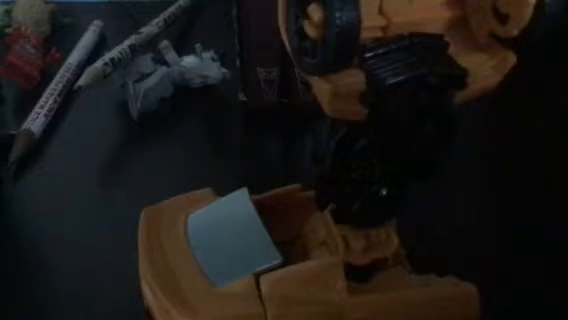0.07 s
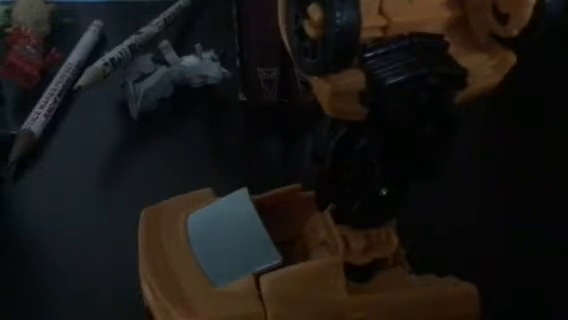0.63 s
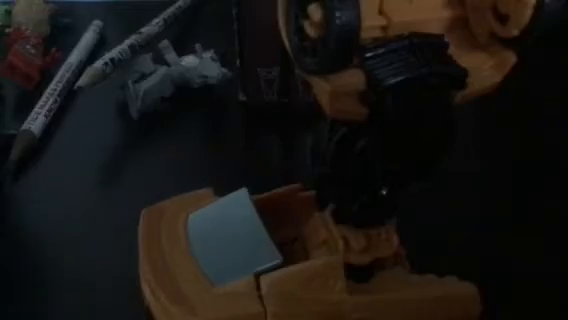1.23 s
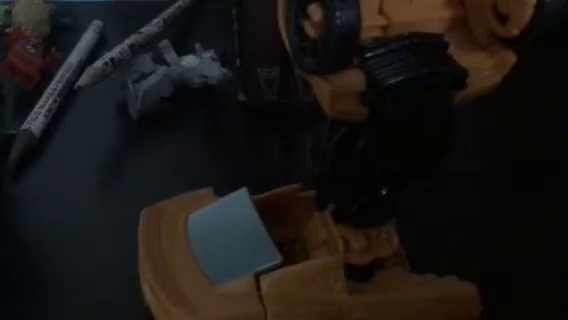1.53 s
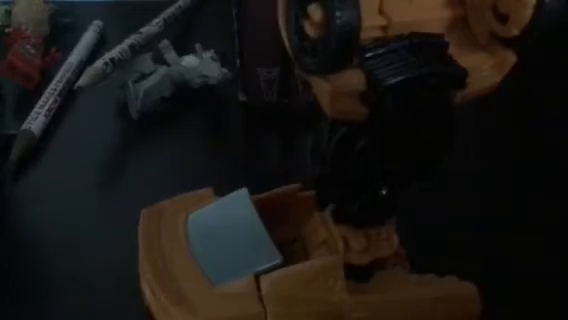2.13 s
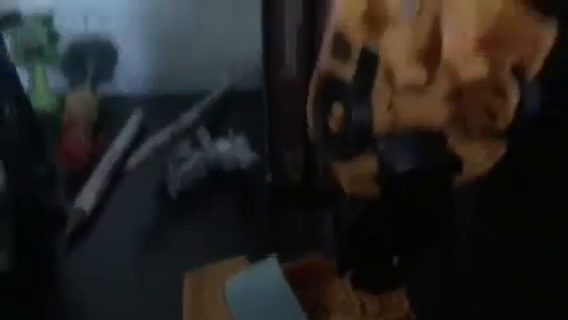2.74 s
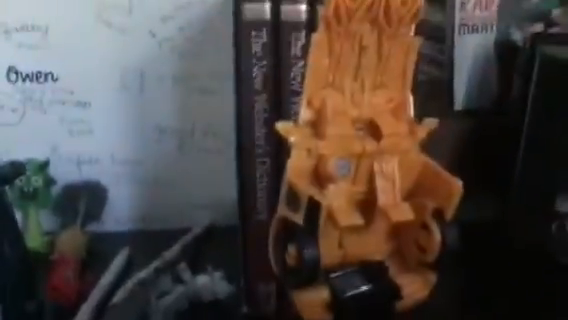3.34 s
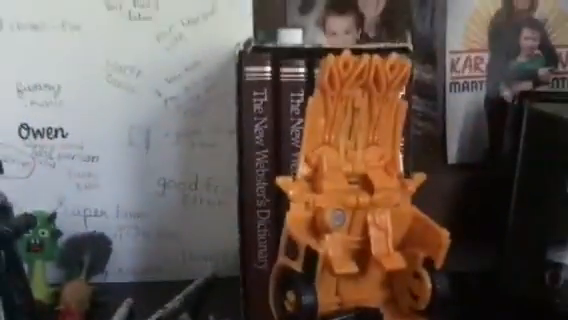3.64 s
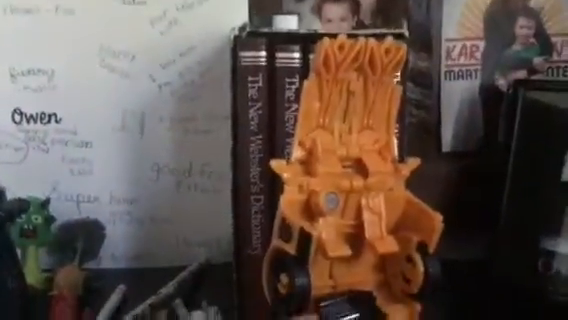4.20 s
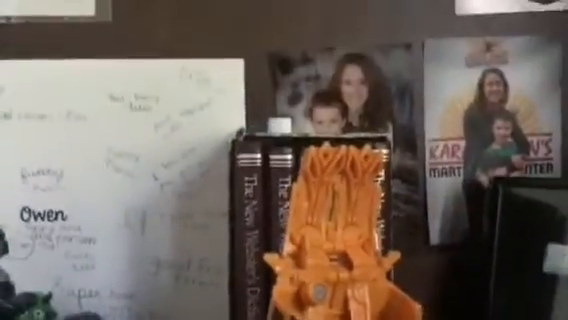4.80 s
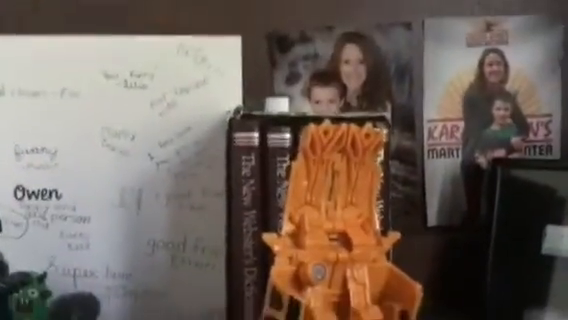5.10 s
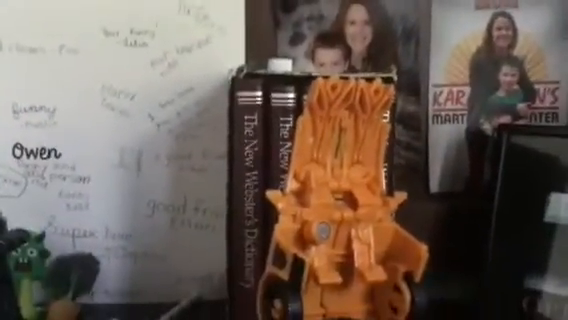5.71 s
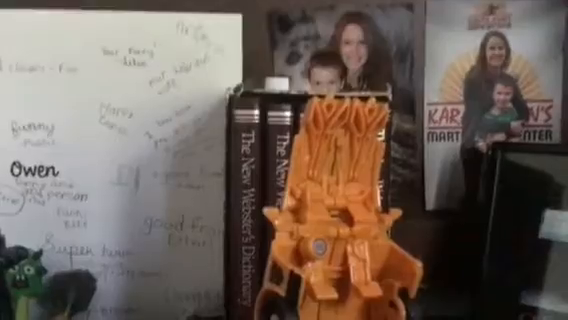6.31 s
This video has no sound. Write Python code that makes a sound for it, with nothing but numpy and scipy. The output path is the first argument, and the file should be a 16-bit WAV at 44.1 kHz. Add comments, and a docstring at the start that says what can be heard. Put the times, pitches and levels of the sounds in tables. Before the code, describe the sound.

In a small, quiet room, a fan hums faintly while plastic is handled right by the microphone. First comes a hard knock on a desk and a short slide. Uneven clicks, snaps and brief scrapes follow as fingers move over a hollow toy and its joint gives. Toward the end a second low hum swells softly, and the handling fades to light rubbing and dull bumps.

```python
"""A hollow plastic case, handled at a desk in a small, quiet room, very near the microphone.
First one plastic piece knocks on the desk and slides. Then the case is gripped and tilted:
fingers stick and slip over it, its joint scrapes and snaps, and each contact rings the shell.
A fan hums low underneath, and a second low hum swells towards the end."""
import sys
import numpy as np
from scipy import signal
from scipy.fft import rfft, irfft
from scipy.io import wavfile
from scipy.ndimage import uniform_filter1d

SR = 44100
rng = np.random.default_rng(int(sys.argv[2]) if len(sys.argv) > 2 else 0)


def pcm_store(signal):
    """Save signal as 16-bit PCM."""
    levels = np.round(np.clip(np.atleast_2d(signal), -1, 1) * 32767)
    wavfile.write(sys.argv[1], SR, levels.astype(np.int16).T)


N = 280035
T = np.arange(N) / SR
BODY_HZ, CRACK_HZ, CRACK_TOP_HZ, TOP_HZ = 268, 1198, 6900, 16100  # band edges


def undb(db):
    """Decibels to gain."""
    return 10 ** (np.asarray(db) / 20)


def unit(x):
    """Scale to rms 1."""
    return x / np.sqrt(np.mean(x ** 2))


def steady(x, span_s=0.037):
    """Keep the grain, but even out the slow level to rms 1."""
    return x / np.sqrt(uniform_filter1d(x ** 2, int(span_s * SR)) + 1e-6 * np.mean(x ** 2))


def band(x, lo_hz, hi_hz, order=3):
    """Causal band-pass."""
    return signal.sosfilt(signal.butter(order, [lo_hz, hi_hz], "band", fs=SR, output="sos"), x)


def resonate(x, hz, width_hz):
    """One resonance, gain 1 at its centre."""
    return signal.lfilter(*signal.iirpeak(hz, hz / width_hz, fs=SR), x)


def walk(per_s):
    """Smooth random wander, rms 1."""
    k = int(SR / per_s)
    steps = np.repeat(rng.standard_normal(N // k + 1), k)
    return unit(uniform_filter1d(uniform_filter1d(steps, k), k)[:N])


def fan_and_room_tone(waver_hz=1.1, flutter_db=1, air_db=-65.5):
    """A wavering fan hum over low room noise and microphone hiss."""
    # fan, mains and two faint whines: (frequency [Hz], level [dB])
    hum_lines = [(70, -64), (116, -68), (167, -81.5), (210, -73.5), (690, -89.5), (3155, -101)]
    # room noise and hiss: (frequency [Hz], relative density [dB])
    air_spectrum = [(25, -18.5), (45, -6), (70, -3.5), (100, -9), (210, -15), (290, -21.5), (450, -28.5),
                    (680, -31), (900, -37.5), (1800, -42), (5000, -44), (8000, -48), (16000, -56)]
    air_hz, density_db = np.transpose(air_spectrum)
    bins_hz = np.fft.rfftfreq(N, 1 / SR) + 1
    colour = undb(np.interp(np.log(bins_hz), np.log(air_hz), density_db))
    air = irfft(rfft(rng.standard_normal(N)) * colour, N)
    hum = np.zeros(N)
    for hz, db in hum_lines:
        peak = np.sqrt(2) * undb(db + flutter_db * walk(9.4))
        hum += peak * np.sin(2 * np.pi * np.cumsum(hz + waver_hz * walk(7.8)) / SR)
    return undb(air_db) * unit(air) + hum


def slips(per_s, spread_db):
    """Stick-slip: tiny releases at random moments, a few much larger than the rest."""
    size = undb(spread_db * np.minimum(rng.exponential(size=N), 4))
    return (rng.random(N) < per_s / SR) * size * rng.choice([-1, 1], N)


def hollow_case(force, grip_db, tuning=0.98, direct_db=-19, reflection_s=0.0017, reflection=0.12):
    """A force rings the case; the grip changes the level of each resonance by its own amount."""
    # resonances of the shell: (frequency before tuning [Hz], width [Hz], gain [dB])
    case_modes = [(200, 120, 2), (320, 192, 4.5), (508, 177, 3), (602, 102, 2), (787, 140, -2.5),
                  (1100, 340, -6.5), (1400, 110, -9.5), (1517, 110, -6.5), (1975, 360, -10.5),
                  (2164, 160, -5.5), (2387, 150, -12), (2970, 350, -9), (2980, 140, -9.5),
                  (3400, 260, -23.5), (3680, 250, -40.5), (4700, 430, -29), (5000, 300, -15),
                  (5720, 500, -31.5), (8800, 310, -20), (12400, 560, -34.5), (15000, 1800, -33)]
    out = undb(direct_db) * band(force, 330, 4900, order=4)
    for k, (hz, width, db) in enumerate(case_modes):
        grip = walk(9) if len(force) == N else rng.standard_normal()  # constant through a short snap
        out += (-1) ** k * undb(db + grip_db * grip) * resonate(force, hz * tuning, width)
    # a reflection from a surface close by hollows the tone
    delayed = np.pad(out, (int(reflection_s * SR), 0))[:len(out)]
    return out + reflection * delayed


def stroke_pressure(t, length, swell_db, arch_db=4, attack_s=0.02, release_s=0.01):
    """A stroke takes hold, swells or eases along an arch, and lets go."""
    from_middle = np.clip(t / length, 0, 1) - .5
    hold = undb(swell_db * from_middle + arch_db * (np.cos(np.pi * from_middle) - .5))
    return np.minimum(t / attack_s, 1) * hold * np.exp(-np.maximum(t - length, 0) / release_s)


def sliding(jerk_db=1.5, rasp_share=0.49, sheen_db=-35.5, sheen_slope=0.75):
    """Skin drags dully over the case; harder contact adds grit; the hand's weight rumbles."""
    # strokes of a finger or a sliding piece, levels before the trims: (start [s], length [s], drag [dB],
    # swell [dB], grit over drag [dB], hand weight over drag [dB], rasp pitch [Hz], rasp gain [dB])
    strokes = [ (0.611, 0.087, -68, -16, -11, 16, 134, 21), (0.812, 0.14, -81, 1, 2, 14.5, 5500, 7),
               (0.948, 0.072, -60.5, 7.5, -7.5, 10.5, 1980, -3), (1.043, 0.08, -37.5, 3, -21, -3, 343, 6),
               (1.136, 0.18, -63.5, -11, -11, 5, 570, 4), (1.32, 0.065, -67, -0.5, -10.5, 8, 408, -3),
               (1.38, 0.33, -73.5, 2, -9, 6, 4500, -8), (1.969, 0.073, -77, -2.5, 3.5, 10, 5500, 8.5),
               (2.049, 0.053, -55.5, -7.5, -7.5, 7, 296, -3), (2.172, 0.053, -60, -12, 0, -7, 5000, -2),
               (2.227, 0.13, -42, 12, -20.5, -24, 610, 8), (2.363, .12, -45.5, -6.5, -14, -12.5, 750, -8),
               (2.436, 0.1, -48.5, 19.5, 1.5, -21, 1620, -5), (2.658, 0.063, -50, 13, -2.5, -9, 2150, -1),
               (2.772, 0.055, -53.5, 13, -9, -9, 2150, 2), (2.831, 0.13, -50.5, 14, -10, -8.5, 970, -15),
               (3.037, 0.042, -50.5, 6.5, -10, -22, 594, -18), (3.102, 0.08, -62, -16, -13.5, -1, 580, -6),
               (3.18, 0.096, -60, -10.5, -7.5, 3, 2000, -17), (3.275, 0.05, -52, 7.5, -1, 7, 2020, -3),
               (3.589, 0.13, -63, 0, -9.5, 4, 4600, -4), (3.702, .12, -58.5, 2, -9.5, 9.5, 252, 7.5),
               (3.888, 0.12, -51, 5.5, -16.5, -16.5, 4700, -1),
               (3.986, 0.16, -57, 7.5, -16.5, -7, 780, -40), (4.16, 0.079, -54.5, 4.5, -16, -15, 442, 0),
               (4.375, 0.069, -49.5, 17, -28, -8, 357, 11), (4.411, 0.072, -54.5, 32, 4, -17, 4570, -16),
               (4.497, 0.1, -43, -4, -3.5, -30, 4660, -21), (4.899, 0.1, -58, 9, -3.5, 6, 3400, -1),
               (4.992, 0.083, -51, 0, -15.5, -1, 380, 10.5),
               (5.071, 0.089, -48, 13.5, -8.5, -3.5, 1095, -2), (5.31, 0.059, -74, -12, -2.5, 5, 4360, -5),
               (5.443, .033, -58.5, -3, -7.5, 5, 512, 12), (5.571, 0.18, -70, -1.5, -8.5, 11, 301, 1.5),
               (5.735, 0.073, -62.5, -6, -9, 9, 298, -1.5), (5.855, 0.15, -64, -6.5, -10, 7, 305, 0.5),
               (6.113, 0.13, -70.5, 10, -11, 11, 232, -3.5), (6.233, 0.055, -52, -18, -26.5, 9, 380, 9.5),
               (6.328, .03, -57.5, 7, -4, 10, 5000, 7)]
    drag_trim_db, scrape_trim_db, rumble_trim_db = -1, -1, -2
    force = slips(per_s=3400, spread_db=2.5) * undb(jerk_db * walk(85))  # the contact catches unevenly
    shell = hollow_case(force, grip_db=3)
    hand = slips(per_s=720, spread_db=3.5)
    # soft skin passes little of the highest treble
    sheen = steady(band(band(force, 7200, TOP_HZ), 2600, 10000, order=1))
    out = holding_hand(shell)
    for start, length, db, swell_db, grit_db, weight_db, rasp_hz, rasp_db in strokes:
        span = slice(int(start * SR), int((start + length) * SR) + SR // 8)
        # each stroke catches at one pitch
        width = rasp_share * rasp_hz
        rung, rocked = (x + undb(rasp_db) * resonate(resonate(x, rasp_hz, width), rasp_hz, width)
                        for x in (shell[span], hand[span]))
        press = undb(db) * stroke_pressure(T[:len(rung)], length, swell_db)
        drag = steady(band(rung, BODY_HZ, CRACK_HZ)) * undb(drag_trim_db)
        scrape = steady(band(rung, CRACK_HZ, 6400, order=7)) * undb(grit_db + scrape_trim_db)
        rumble = steady(band(rocked, 68, 235)) * undb(weight_db + rumble_trim_db)
        # a light touch is airier than a firm one
        hiss = undb(sheen_db) * (press * undb(grit_db)) ** sheen_slope * sheen[span]
        out[span] += press * (drag + scrape + rumble) + hiss
    return out


def desk_knocks(crack_db=-9, crack_s=0.012, hard_contact_s=0.0017):
    """A piece lands, bounces and settles; softer contacts ring fewer of the desk's high modes."""
    # blows and soft bumps: (time [s], strength [dB], contact time [s])
    blows = [(0.623, -45, .004), (1.024, -12, .0003), (1.029, -28.5, 0.00042), (1.0385, -36, .0002),
             (1.106, -28, 0.00067), (5.439, -37.5, 0.0017), (6.244, -36, 0.002)]
    # desk top with the piece on it: (frequency [Hz], gain [dB], time to fall 60 dB [s])
    desk_modes = [(136, -27, 0.66), (237.6, -8.5, 0.057), (288, -9.5, 0.18), (395.5, -6, 0.11),
                  (460, -3.5, 0.027), (562.2, -8, 0.095), (679, 3, .05), (858, -1.5, 0.067),
                  (1082, -7.5, 0.081), (1330, -6.5, 0.028), (1560, -13, 0.073), (1825, -10.5, .06),
                  (2078, -13, 0.086), (2266, -11.5, .05), (2795, -10.5, .05), (3746, -24, 0.043),
                  (4900, -45, .05)]
    out = np.zeros(N + SR)
    t = T[:SR // 2]
    ring = sum((-1) ** k * undb(db) * np.sin(2 * np.pi * hz * t) * np.exp(-np.log(1000) * t / t60)
               for k, (hz, db, t60) in enumerate(desk_modes))
    for start, db, contact_s in blows:
        push = np.exp(-t / contact_s)
        crack = unit(band(rng.standard_normal(len(t)), 900, 3700, order=2)) * np.exp(-t / crack_s)
        crack /= 1 + (contact_s / hard_contact_s) ** 2  # only hard contacts crackle
        knock = signal.fftconvolve(ring + undb(crack_db) * crack, push / push.sum())[:len(t)]
        out[int(start * SR):][:len(t)] += undb(db) * knock
    return out[:N]


def joint_snaps(chatter=0.14, tail_db=-23, tail_s=0.0055, bite_db=-7, bite_share=0.081):
    """A joint lets go: a sharp push and a fading chatter ring the case, which rocks in the hand."""
    # snaps and taps: (time [s], body level [dB], hardness as crack over body [dB],
    # thump over body [dB], chatter decay [s], crack pitch [Hz])
    snaps = [(1.171, -59.5, -5, 16, 0.00056, 2550), (2.07, -59, -2.5, -10, 0.015, 6030),
             (2.095, -43.5, -6, 1, 0.0048, 2260), (2.105, -52.5, 1, 6.5, .016, 3460),
             (2.153, -59.5, 3.5, 7.5, 0.0017, 2700), (2.1829, -39, -12, -28, 0.0018, 1870),
             (2.1936, -41, -21, -24, 0.0034, 1670), (2.234, -60, -0.5, -18, 0.0022, 1670),
             (2.316, -56, -1.5, 0, .001, 3400), (2.55, -46.5, -19, 7.5, 0.0042, 1400),
             (2.712, -40, 2.5, -8, .003, 2000), (2.73, -29.5, -1, -8, 0.0035, 1604),
             (2.926, -37.5, -4.5, -7.5, 0.0018, 1345), (3.047, -57.5, -26, -2, 0.00092, 1400),
             (3.297, -49.5, 1.5, -20, 0.002, 4630), (3.316, -41, -4, 8, 0.0014, 2050),
             (3.319, -54, 15, 18, 0.0016, 4850), (3.484, -67.5, -7, 6, 0.0044, 3970),
             (3.895, -52, -14, -2, 0.0018, 1500), (4.213, -54, -13, -14, 0.003, 2230),
             (4.254, -52.5, -32, -11, 0.0064, 1520), (4.306, -54.5, -18.5, -6, .005, 2480),
             (4.356, -59, -11, 6, 0.0036, 3400), (4.4929, -36.5, -12, -17, 0.0025, 1720),
             (4.591, -53, 8, 5.5, 0.0017, 4430), (4.635, -39, -6.5, -9.5, 0.0022, 2790),
             (4.906, -57, -8.5, 5.5, .0023, 2680), (5.294, -55, -6, -7, 0.0049, 4400),
             (5.753, -58, -13, 3.5, 0.0024, 2450)]
    thump_hz, rise_s, decay_s = 135, 0.0038, 0.005
    out = np.zeros(N + SR)
    t = T[:SR // 8]
    thump = np.sin(2 * np.pi * thump_hz * t) * np.exp(-t / decay_s) * (1 - np.exp(-t / rise_s))
    for start, body_db, hard_db, thump_db, chatter_s, crack_hz in snaps:
        fade = np.exp(-t / chatter_s)
        force = chatter * rng.standard_normal(len(t)) * (fade + undb(tail_db) * np.exp(-t / tail_s))
        force[0] += 1  # the sharp push
        tuning = np.clip(1 + 0.082 * rng.standard_normal(), .9, 1.1)
        shell = hollow_case(force, grip_db=1, tuning=tuning)
        body = band(shell, BODY_HZ, CRACK_HZ)
        # the small part that slips adds its own short ring
        bite = undb(bite_db) * resonate(force, crack_hz, bite_share * crack_hz)
        crack = band(shell + bite, CRACK_HZ, CRACK_TOP_HZ)
        # the finest asperities break one after another, so the sizzle grows with hardness and chatter
        fizz = rng.standard_normal(len(t)) * fade
        sizzle = band(band(fizz, 7800, TOP_HZ), 2600, 9800, order=1)
        sizzle_db = -19.5 + 1.2 * hard_db + 20 * np.log10(chatter_s / 0.0022)
        for db, part in [(thump_db, thump), (0, body), (hard_db, crack), (sizzle_db, sizzle)]:
            rms = np.sqrt(np.sum(part ** 2) / (SR * 0.019))  # as if all its energy fell within 19 ms
            out[int(start * SR):][:len(t)] += undb(body_db + db) * part / rms
    return out[:N]


def holding_hand(shell, from_s=1.9, level_db=-80, restless_db=3):
    """Once the case is held, the hand creeps faintly over it, even between strokes."""
    creep = steady(band(shell, BODY_HZ, CRACK_TOP_HZ))
    return creep * undb(level_db + restless_db * walk(15)) * (T > from_s)


def tilt_hum(hz=115.6, waver_hz=6.4):
    """A low, wavering hum swells as the case is tilted."""
    # rise and fall of the hum: (time [s], level [dB])
    swells = [(4.5, -59), (4.6, -52.5), (4.8, -61.5), (5.05, -48.5), (5.2, -66.5), (5.5, -67.5),
              (6.35, -59.5)]
    peak = np.sqrt(2) * undb(np.interp(T, *np.transpose(swells), left=-100))
    return peak * np.sin(2 * np.pi * np.cumsum(hz + waver_hz * walk(15)) / SR)


def small_room(x, wet_db=-22, t60_s=0.22):
    """Near walls put a faint, dull tail behind the close sound."""
    t = T[:SR // 2]
    tail = band(rng.standard_normal(len(t)), 100, 5000, order=1)
    tail *= np.exp(-np.log(1000) * t / t60_s) * (t > .005)
    return x + undb(wet_db) * signal.fftconvolve(x, tail / np.sqrt(np.sum(tail ** 2)))[:N]


def scene():
    """The handling close up, with room tone behind it, in mono."""
    handling = sliding() + joint_snaps() + desk_knocks()
    return (small_room(handling) + fan_and_room_tone() + tilt_hum())[None]


def record(dry):
    """The microphone drops the deep bass and the very top."""
    low_cut = signal.butter(5, 47, "high", fs=SR, output="sos")
    high_cut = signal.ellip(8, .2, 70, TOP_HZ, fs=SR, output="sos")
    return signal.sosfilt(high_cut, signal.sosfilt(low_cut, dry))


dry = scene()
out = record(dry)
pcm_store(out)
```